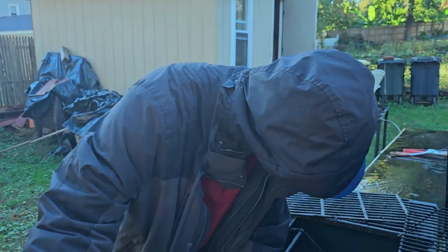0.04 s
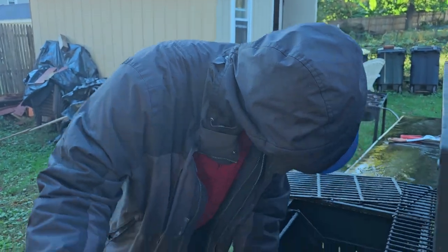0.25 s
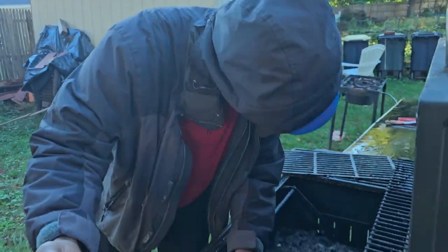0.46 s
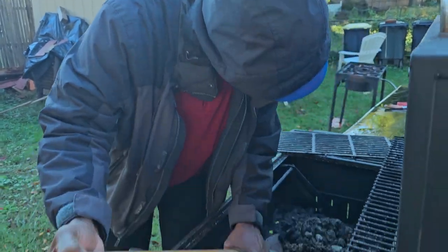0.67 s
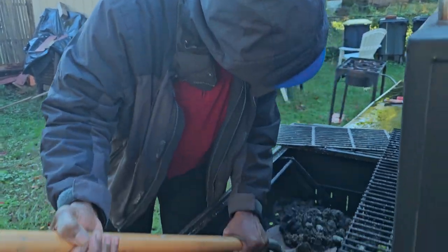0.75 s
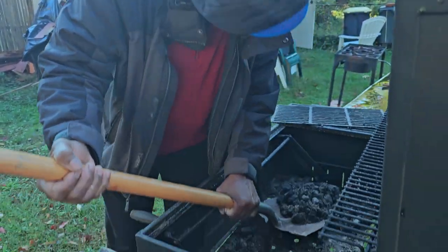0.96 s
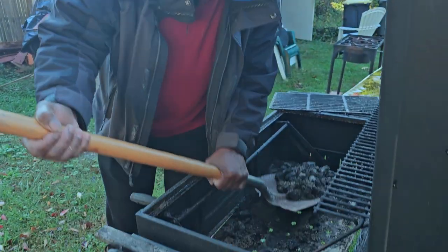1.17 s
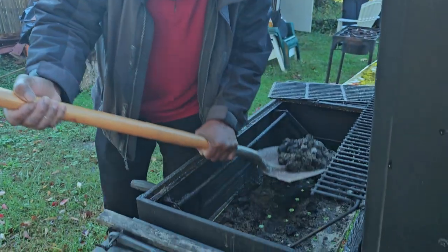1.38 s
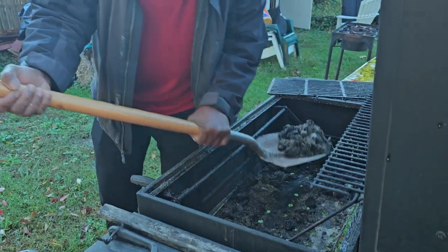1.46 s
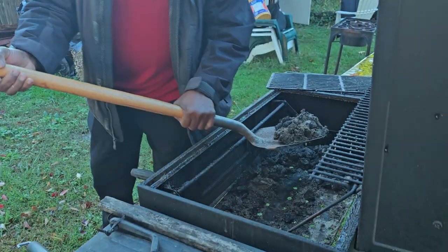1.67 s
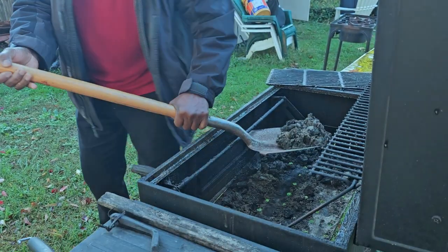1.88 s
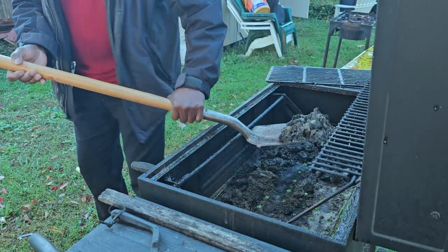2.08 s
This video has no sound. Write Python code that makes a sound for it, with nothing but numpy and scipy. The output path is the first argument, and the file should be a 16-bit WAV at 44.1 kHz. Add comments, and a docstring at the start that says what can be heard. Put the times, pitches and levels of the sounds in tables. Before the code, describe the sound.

A steel shovel scrapes twice through gritty ash in a metal grill, then bumps down.

```python
"""A steel shovel is pushed twice through ash and clinker (hard burnt lumps) in a big outdoor grill.
The blade grinds, catches and jolts free, so that it rings along with the floor plate and steel firebox.
Ash rustles, lumps tumble and crumbs drop; the load is lifted with a soft thump, then the shovel bumps
down and ash starts to slide. Crunches are showers of tiny clicks that set these parts ringing.
Behind it all are a town's low rumble, a far bird's whistles and a faint chirping insect."""
import sys
import numpy as np
from scipy import signal
from scipy.fft import rfft, irfft
from scipy.io import wavfile

SR = 44100
rng = np.random.default_rng(int(sys.argv[2]) if len(sys.argv) > 2 else 0)


def output_pcm(signal):
    """Save a mono or channel-first signal as 16-bit PCM at the path in sys.argv[1].

    Samples are clipped to [-1, 1] before scaling.
    """
    pcm = np.clip(np.atleast_2d(signal).T, -1, 1) * 32767
    wavfile.write(sys.argv[1], SR, np.round(pcm).astype(np.int16))


N = 93183
T = np.arange(N) / SR
HZ = np.arange(N // 2 + 1) * SR / N
NEAR_ALIKE_HZ, FAR_ALIKE_HZ = 1870, 664  # left and right sound alike below these
SIDES = np.array([[1], [-1]])  # left, right
HIT_SIZE = np.sqrt(0.011 * SR)  # gives a hit the energy of 11 ms of sound at level 1


def undb(db):
    """Turn decibels into a gain to multiply by."""
    return 10 ** (np.asarray(db) / 20)


def unit(x):
    """Scale to an average level (rms) of 1."""
    return x / np.sqrt(np.mean(x ** 2))


def energy(x):
    """Scale each channel to an energy of 1."""
    return x / np.sqrt(np.sum(x ** 2, axis=-1, keepdims=True))


def curve(rows):
    """Gain over time through (time [s], level [dB]) points."""
    return undb(np.interp(T, *np.array(rows).T))


def colour(x, points):
    """Shape the tone of a sound through (frequency [Hz], level [dB]) points."""
    hz, db = np.array(points, float).T
    gain = undb(np.interp(np.log(HZ + 1), np.log(hz), db))
    cepstrum = irfft(np.log(gain), N)
    cepstrum[1:N // 2] *= 2  # folded so that the filter rings after a click, not before
    cepstrum[N // 2:] = 0
    return irfft(rfft(x) * np.exp(rfft(cepstrum)), N)


def stereo_noise(alike_hz=NEAR_ALIKE_HZ):
    """Left and right noise, alike in the bass and unrelated in the treble."""
    mid, side = rfft(rng.standard_normal((2, N)))
    alike = .85 / (1 + (HZ / alike_hz) ** 2)
    return irfft(np.sqrt(1 + alike) * mid + np.sqrt(1 - alike) * side * SIDES, N) / np.sqrt(2)


def wander(rate_hz):
    """A smooth random wobble with a typical size of 1."""
    return unit(irfft(rfft(rng.standard_normal(N)) * np.exp(-(HZ / rate_hz) ** 2), N))


def fade(seconds):
    """Die away by 60 dB in the given time."""
    return np.exp(-np.log(1000) * T / seconds)


def ring(tones, fade_s):
    """A struck part's tones; fade_s holds at 1 kHz, and higher tones die sooner."""
    chances = rng.uniform(-np.pi, np.pi, (len(tones), 2))
    sound = 0
    for (hz, db), (phase, side) in zip(tones, chances):
        ear_shift = np.sign(side) * SIDES * hz / (hz + NEAR_ALIKE_HZ / 2)  # ears a little out of step
        tone = np.sin(2 * np.pi * hz * T + phase + ear_shift)
        sound = sound + undb(db) * energy(fade(fade_s * 1000 / hz) * tone)
    return energy(sound)


def play(force, response):
    """Shake a part with a force: every click starts a copy of the part's response."""
    return signal.oaconvolve(np.atleast_2d(force), response, axes=-1)[:, :N]


def grit(per_s, spread_db):
    """Clicks of breaking grains, a few extra large; one stream is shared and each ear has its own."""
    size = undb(spread_db * np.minimum(rng.exponential(size=(3, N)), 4))
    clicks = (rng.random(size=(3, N)) < per_s / SR) * size * rng.choice([-1, 1], size=(3, N))
    return unit(clicks[0] + 0.65 * clicks[1:])


def burst(grains, start, length, attack_s=0.00036):
    """A short crunch: a run of grains that starts sharply and dies away."""
    age = np.maximum(T - start, 0)
    return energy(grains * (1 - np.exp(-age / attack_s)) * np.exp(-(age / length) ** 2)) * HIT_SIZE


def scrape():
    """Grinding and jolts shake the blade, floor plate and firebox; the sound drifts to the left."""
    # grinding under the edge (time [s], level [dB])
    grind_levels = [(.06, -38), (.13, -27.5), (.225, -39), (.24, -55), (.585, -65), (.592, -48),
                    (.67, -26.5), (.785, -34), (.80, -49), (.87, -44.5), (.91, -69)]
    # the blade catches on clinker (time [s], level [dB], length [s], treble [dB], blade ring [dB])
    jolts = [(0.0347, -35.5, 0.0049, 8, -5.5), (0.091, -19.5, 0.0062, -1, -1),
             (0.105, -21.5, 0.0042, 9.5, -1.5), (0.13, -26.5, 0.0083, 6.5, -4),
             (0.177, -25.5, 0.013, 5, -4), (0.2163, -32, 0.0057, 3.5, -5), (0.6661, -27, 0.0015, 17.5, -17),
             (0.674, -22, 0.0035, 3.5, 0), (0.703, -21.5, .009, -2, -20.5), (0.7417, -22, 0.014, -4, 3.5),
             (0.756, -17, 0.0056, 0, 5), (0.764, -17.5, .004, 3.5, -5), (0.809, -32, 0.004, -0.5, -20),
             (0.865, -32.5, 0.0035, -24, -32)]
    # the edge rasps along the floor plate (time [s], length [s], level [dB])
    rasps = [(.645, 0.034, -29.5), (0.676, 0.0087, -19.5), (0.806, 0.053, -35)]
    # ringing tones of the three steel parts (pitch [Hz], level [dB])
    plate_tones = [(2783, 0), (2912, 0), (3248, 1), (3290, -1), (3433, -1)]
    firebox_tones = [(738, -8), (1346, -4), (1540, -3), (1860, -4), (8430, -6), (11450, -3), (11725, -4)]
    blade_tones = [(2230, -9), (4426, 0), (4553, -3), (4783, -2), (7275, -7), (10395, -9)]
    grind = grit(per_s=4200, spread_db=7) * curve(grind_levels) * undb(1.7 * wander(47))
    pushes, on_blade = [grind], undb(-8) * grind
    grains = grit(per_s=14000, spread_db=-1.5)
    treble_cut = signal.butter(4, 8400, fs=SR, output="sos")
    for start, db, length, treble_db, ring_db in jolts:
        crunch = undb(db) * burst(grains, start, length)
        dull = signal.sosfiltfilt(treble_cut, crunch)
        jolt = dull + undb(treble_db) * (crunch - dull)
        pushes.append(jolt)
        on_blade = on_blade + undb(ring_db) * jolt
    force = sum(pushes)
    rasp = sum(undb(db) * burst(grains, start, length) for start, length, db in rasps)
    plate = play(undb(-10.5) * force + rasp, ring(plate_tones, fade_s=0.16))
    firebox = clatter(pushes) + undb(-9) * play(force, ring(firebox_tones, fade_s=0.16))
    blade = play(on_blade, ring(blade_tones, fade_s=0.15))
    drift_db_per_s, centred_s = 3, 0.1983
    pan = undb(drift_db_per_s * (T - centred_s) * SIDES / 2)
    return pan * (firebox + plate + blade)


def clatter(pushes):
    """The walls ring briefly, differently at each spot that is hit, with a faint shared tail."""
    # tone of the firebox walls (frequency [Hz], level [dB])
    wall_colour = [(150, -39.5), (400, -22), (800, -5.5), (1050, -9.5), (1450, 0), (2400, -0.5), (3100, 3),
                   (4500, -2), (7500, -2.5), (12000, -5), (16000, -13.5)]
    spots = np.array_split(stereo_noise(), len(pushes), axis=1)
    decay = fade(0.044)
    walls = sum(play(push, energy(spot * decay[:spot.shape[1]])) for push, spot in zip(pushes, spots))
    tail = undb(-18) * play(sum(pushes), energy(stereo_noise(FAR_ALIKE_HZ) * fade(0.33)))
    return play(walls + tail, energy(colour(signal.unit_impulse((1, N)), wall_colour)))


def shifting_load():
    """Ash shifts softly and a few loose lumps tumble on the load."""
    # tumbling lumps, and the rustle of ash and sleeves (time [s], level [dB])
    tumbles = [(0.475, -51), (.865, -39), (.985, -50.5), (1.118, -43), (1.665, -47.5)]
    rustle_levels = [(0, -45.5), (.22, -38.5), (.33, -46.5), (.57, -47.5), (.66, -38.5), (.92, -55),
                     (1.12, -53), (1.40, -67), (1.76, -49.5), (1.9, -63), (2.04, -43)]
    # tone of a lump and of the ash (frequency [Hz], level [dB])
    lump_colour = [(150, 2.5), (1400, -2.5), (2200, -5), (4200, -7), (16000, -48)]
    ash_colour = [(100, -4), (235, 2), (420, -5.5), (3000, -19), (16000, -59)]
    grains = grit(per_s=2200, spread_db=7.4)
    knocks = sum(undb(db) * burst(grains, start, 0.015) for start, db in tumbles)
    lumps = play(knocks, energy(colour(stereo_noise() * fade(0.046), lump_colour)))
    rustle = unit(colour(stereo_noise(), ash_colour)) * curve(rustle_levels)
    return lumps + rustle * undb(1.5 * wander(23))


def town(hum_hz=74.6):
    """Low rumble, a wavering engine hum and thin outdoor hiss, all slightly to the left."""
    # tone of the town's noise (frequency [Hz], level [dB])
    town_colour = [(12, -27), (20, -6.5), (53, -2.5), (86, -4), (182, -14), (1860, -40.5), (6180, -45),
                   (16000, -66)]
    # the rumble swells near the end (time [s], level [dB])
    rumble_levels = [(0, -39), (1.74, -40), (1.82, -34)]
    noise = rfft(colour(stereo_noise(FAR_ALIKE_HZ), town_colour))
    bass = 1 / (1 + (HZ / 200) ** 4)
    rumble = unit(irfft(noise * bass, N)) * curve(rumble_levels) * undb(0.6 * wander(11))
    hiss = unit(irfft(noise * (1 - bass), N)) * undb(-53.5)
    engine = np.sin(2 * np.pi * np.cumsum(hum_hz + 1.5 * wander(2.2)) / SR)
    hum = unit(engine * undb(2 * wander(5))) * undb(-52)
    return (rumble + hum + hiss) * undb(SIDES / 2)


def insect(pitch_hz=6130, chirps_per_s=12):
    """A faint insect chirps on one wavering pitch."""
    chirps = (1 + np.cos(2 * np.pi * chirps_per_s * T)) ** 2
    tone = np.sin(2 * np.pi * np.cumsum(pitch_hz + 70 * wander(170)) / SR)
    return undb(-76) * unit(chirps * tone)


def boom(pitch_hz=244, width_hz=34, peak_s=.6, swell_s=.2):
    """A firebox panel booms softly, swelling and fading with the second push."""
    band = rfft(stereo_noise()) / (1 + ((HZ - pitch_hz) / width_hz) ** 2)
    return undb(-46) * unit(irfft(band, N)) * np.exp(-((T - peak_s) / swell_s) ** 2)


def trickle():
    """Crumbs of ash land in small separate clusters of ticks."""
    # crumbs drop off the blade (time [s], level [dB])
    crumbs = [(.471, -51), (0.515, -55), (0.987, -52), (1.669, -61), (1.757, -56)]
    grains = grit(per_s=2500, spread_db=2.16)
    ticks = sum(undb(db) * burst(grains, start, 0.016) for start, db in crumbs)
    return play(ticks, energy(stereo_noise() * fade(.03)))


def bird(base_hz=2190, length_s=.135):
    """A far bird's wavering whistles rise and fall in pitch and echo round the yard."""
    # whistles (time [s], level [dB], pitch rise [Hz])
    whistles = [(0.975, -55.5, 257.4), (1.247, -54, 350), (1.558, -52, 261), (2.001, -56, 344)]
    song = 0
    for start, db, rise_hz in whistles:
        arch = np.sin(np.pi * np.clip((T - start) / length_s, 0, 1))
        hz = base_hz + rise_hz * arch + 55 * wander(150)
        song = song + undb(db) * np.sqrt(2 * np.abs(arch)) * np.sin(2 * np.pi * np.cumsum(hz) / SR)
    song = song * undb(3.5 * wander(45))  # the level flutters
    echo = play(song, energy(stereo_noise(FAR_ALIKE_HZ) * fade(0.35)))
    return .5 * (song + echo)


def thump(start_s=1.569, pitch_hz=137.5, fade_s=0.053):
    """Handling makes a soft, low thump during the lift."""
    age = np.maximum(T - start_s, 0)
    return undb(-23) * np.sin(2 * np.pi * pitch_hz * age) * np.exp(-np.log(1000) * age / fade_s)


def set_down(start_s=2.0525, slide_rise_s=0.031):
    """The loaded shovel lands with one firm blow and a crunch; ash begins to slide over the steel."""
    # ringing tones of the heavy bump (pitch [Hz], level [dB])
    bump_tones = [(129, 4), (199, -3), (515, 10), (762, 1), (1025, -1.5)]
    # tone of the thud and of the sliding ash (frequency [Hz], level [dB])
    thud_colour = [(80, -21), (300, 1.5), (520, 3.5), (1200, -5.5), (3500, -16), (16000, -50)]
    slide_colour = [(300, -4), (3400, -27), (4450, 0.5), (6000, -5.5), (8300, -11), (9200, -3),
                    (10200, -11.5), (16000, -21)]
    blow = signal.unit_impulse(N, int(start_s * SR)) * HIT_SIZE
    crunch = burst(grit(per_s=5500, spread_db=3.2), start_s, 0.0044)
    thud = play(crunch, energy(colour(stereo_noise() * fade(0.14), thud_colour)))
    ringing = undb(-3.5) * play(blow, ring(bump_tones, fade_s=0.15))
    flow = np.clip((T - start_s) / slide_rise_s, 0, 1) ** 2
    grains = flow * grit(per_s=7000, spread_db=1.4)
    slide = play(grains, energy(colour(stereo_noise() * fade(0.028), slide_colour)))
    return undb(-25.5) * (thud + ringing) + undb(-34.5) * slide


def scene():
    """The shovel in the grill and the yard around it."""
    shovel = scrape() + boom() + shifting_load() + trickle() + thump() + set_down()
    return shovel + bird() + insect() + town()


def record(dry, top_hz=16000):
    """Peaks stop at full scale and the highest treble is cut."""
    treble_cut = signal.ellip(10, .2, 80, top_hz, fs=SR, output="sos")
    return signal.sosfilt(treble_cut, np.clip(dry, -1, 1))


dry = scene()
out = record(dry)
output_pcm(out)
```